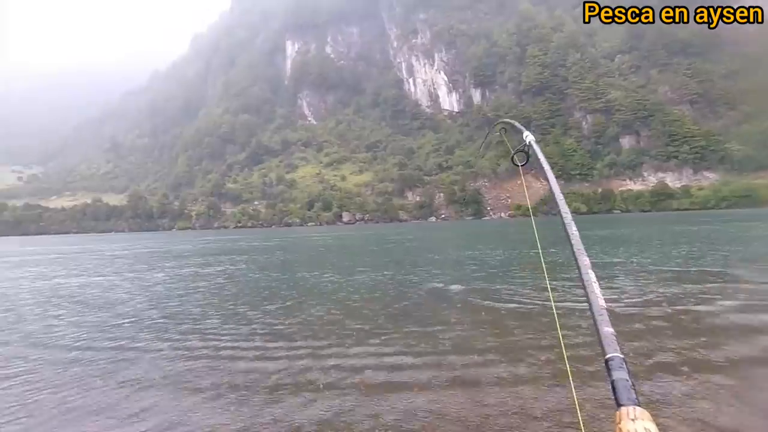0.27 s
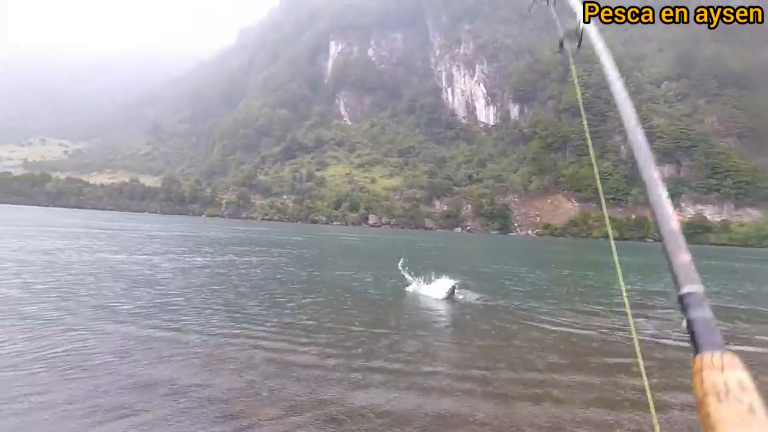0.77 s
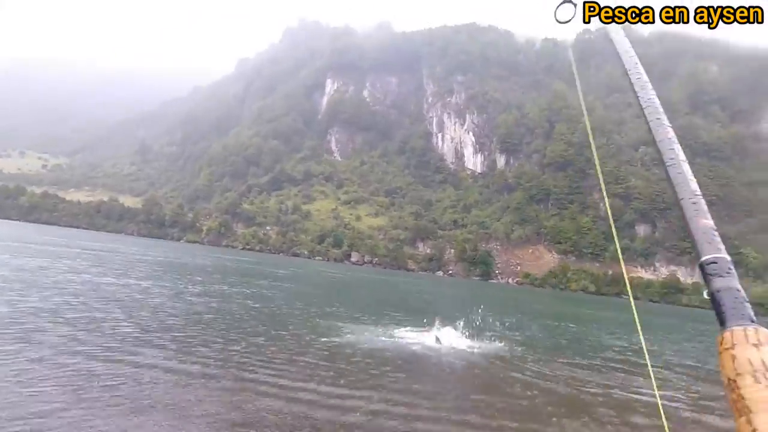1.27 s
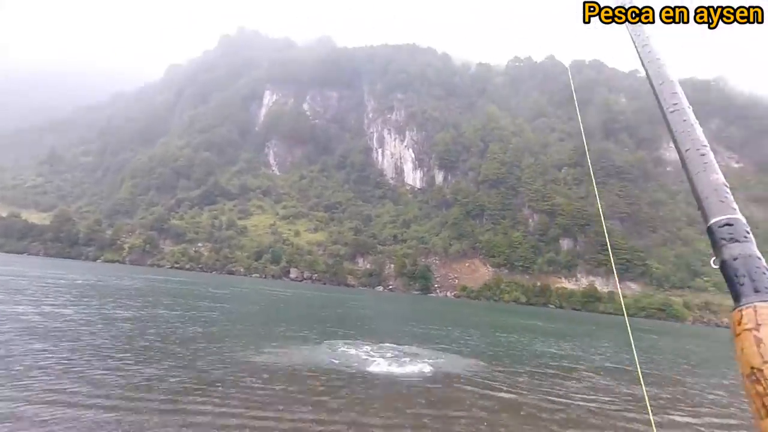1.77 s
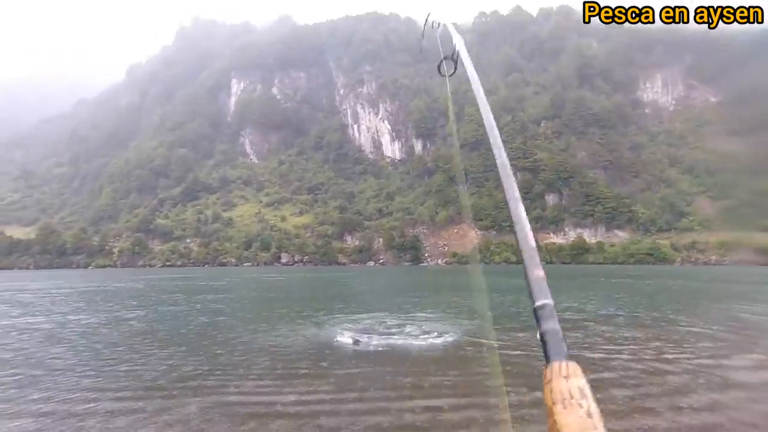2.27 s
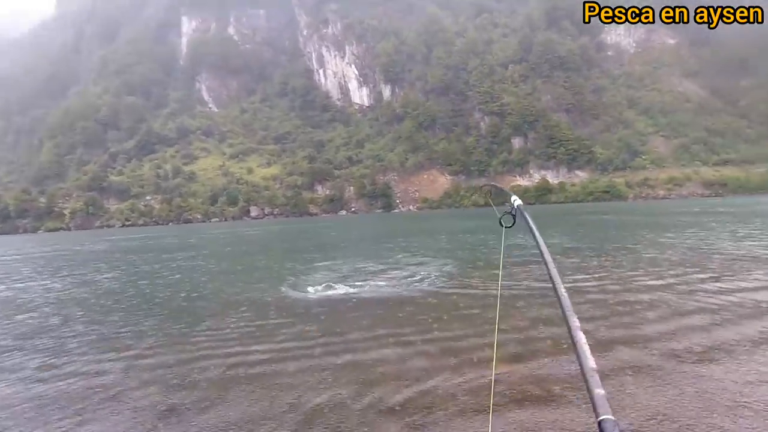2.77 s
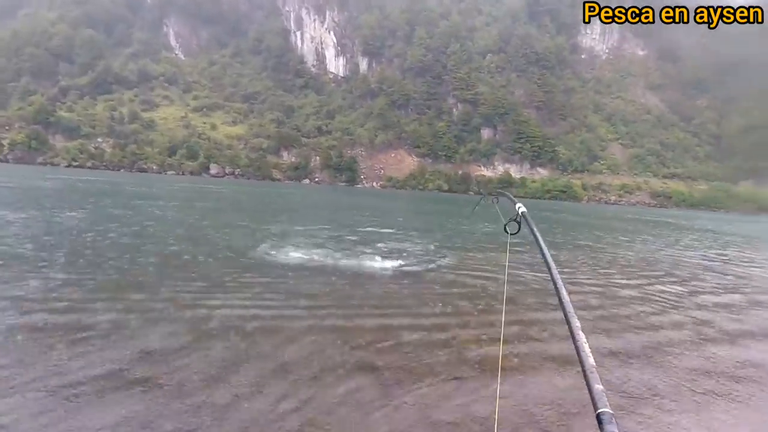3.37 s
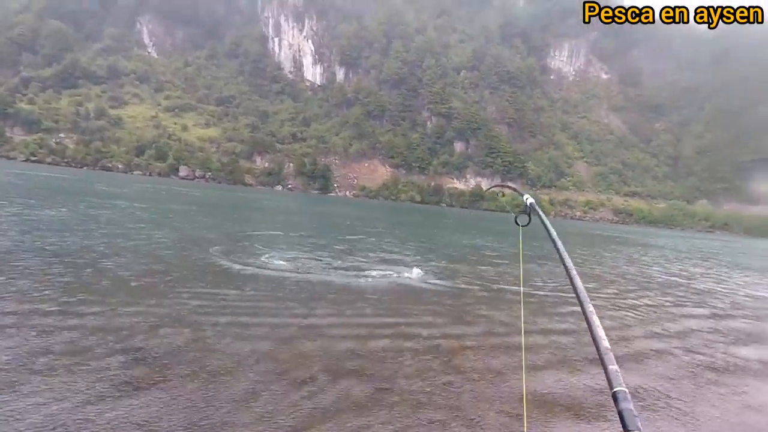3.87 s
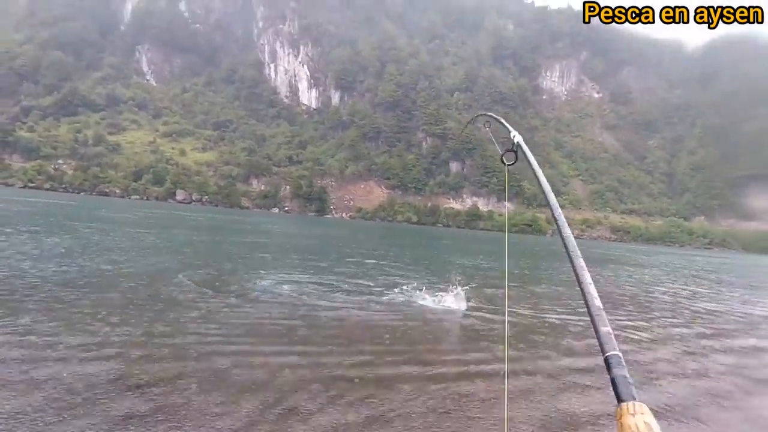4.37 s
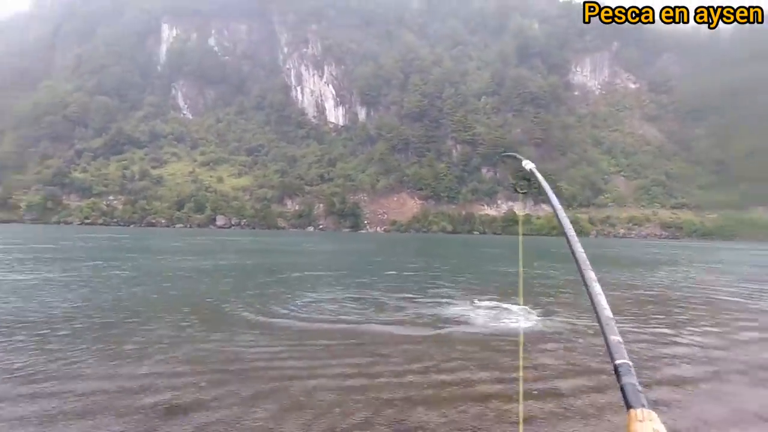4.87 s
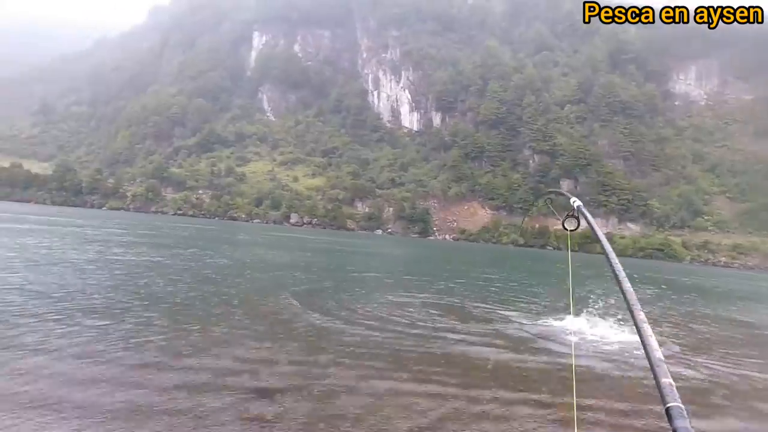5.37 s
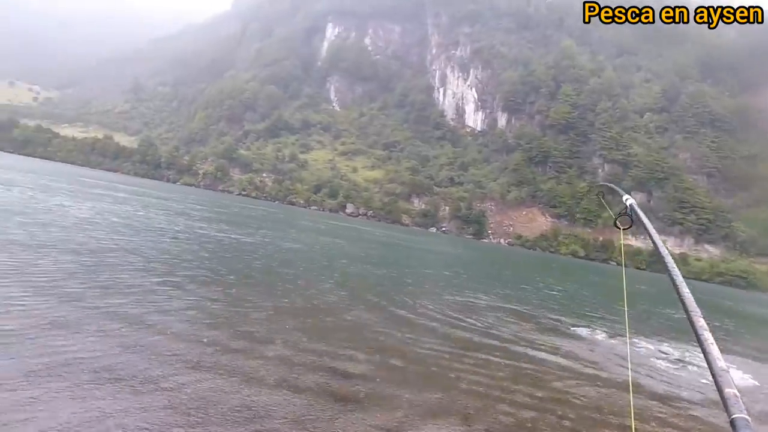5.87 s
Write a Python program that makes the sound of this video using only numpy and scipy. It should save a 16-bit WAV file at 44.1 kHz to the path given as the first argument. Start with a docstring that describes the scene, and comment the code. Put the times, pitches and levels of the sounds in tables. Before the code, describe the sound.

A close, mono outdoor sound beside a river with a faint steady wash. At 0 s a wind thump and six quick, bright reel ticks in the first 0.15 s. Splashes with gulping bubbles come at 0.35 s, a sharp spray burst at 0.75 s, and more at 1.1, 1.4 and 1.7 s, with dry rod taps between and low gusts buffeting until about 3.5 s. From 2.1 s line rasps through the rod rings, first ringing, then a duller scrape, over soft churning. At 2.8 s metallic ticks quicken into a dense buzz by 3.3 s, breaking up around 3.8-4.1 s with small gear knocks. Splashes return at 4.15-4.6 s, wind now weak. Scattered ticks at 4.8-5 s lead to splashes at 5.13 and 5.3 s and a second rattling buzz, 5.2-6.0 s, slowing to a few final ticks as the breeze fades.

```python
"""A hooked fish thrashes at the surface of a river, close to a microphone and a working reel.
First come a few ticks of the reel's pawl, gusts on the microphone, taps on the rod and splashes;
then line rasps through the rod rings as the rod is lowered, and the ticks speed up into a buzz.
After more splashes and scattered ticks comes a second buzz, as the breeze dies down.
Struck parts are fading sine waves, water is bubbles and random clicks, and wind is filtered noise."""
import sys
import numpy as np
from scipy import signal
from scipy.fft import rfft, irfft, next_fast_len
from scipy.io import wavfile
from scipy.ndimage import map_coordinates

SR = 44100
rng = np.random.default_rng(int(sys.argv[2]) if len(sys.argv) > 2 else 0)


def persist_wave(psi):
    """Save psi, clipped to +-1, as 16-bit WAV."""
    counts = np.round(np.clip(psi, -1, 1) * 32767).astype(np.int16)
    wavfile.write(sys.argv[1], SR, np.atleast_2d(counts).T)


N = 270333
TIME = np.arange(N) / SR  # s

# tone colour of the microphone's port: [f/Hz, relative level/dB]
PORT = [(3500, 3), (4200, -2.5), (4900, 4), (5450, 6), (6050, -14.5), (7500, -12.5), (9050, 0),
        (10300, -12), (11800, -18.5), (15000, -22), (15800, -40)]
# modes of the reel's housing: [f/Hz, relative level/dB, time to fade by 60 dB t60/s]
HOUSING_MODES = [(1290, 2, 0.0096), (1588, 5.5, 0.013), (1866, 0, 0.019), (2360, -3.5, 0.0083),
                 (2845, -17, 0.043)]
# long modes of the pawl's spring: [f/Hz, relative level/dB, t60/s]
SPRING_MODES = [(6964, 0.5, 0.12), (7900, -24, .14), (8940, -13, 0.12), (8900, -19, 0.06),
                (10000, -25, .09), (13580, -37, .1)]


def amp(db):
    """Turns decibels into a gain."""
    return 10 ** (np.asarray(db) / 20)


def unit(x):
    """Scales a sound to an rms level of 1."""
    return x / np.sqrt(np.mean(x ** 2) + 1e-20)


def level(rows, axis=1):
    """Gain along a curve of times and decibels; practically silent outside it."""
    rows = np.array(rows)
    return amp(np.interp(TIME, rows[:, 0], rows[:, axis], left=-140, right=-140))


def add(mix, s, sound):
    """Mixes a sound in at time s, cut off where the mix ends."""
    start = max(round(s * SR), 0)
    part = mix[start:][:len(sound)]
    part += sound[:len(part)]


def colour(x, *spectra):
    """Filters a sound by one or more (Hz, dB) curves, then scales it to rms 1."""
    size = next_fast_len(N + 8192)
    log_f = np.log(np.fft.rfftfreq(size, 1 / SR) + 1)
    db = 0
    for spectrum in spectra:
        hz, curve_db = np.array(spectrum).T
        db = db + np.interp(log_f, np.log(hz), curve_db)
    return unit(irfft(rfft(x, size) * amp(db), size)[:N])


def resonate(x, hz, width):
    """Passes a sound through one resonance, with gain 1 at its peak."""
    b, a = signal.iirpeak(min(hz, SR / 3), hz / width, SR)
    return signal.lfilter(b, a, x)


def grains(per_s, spread_db):
    """Clicks at random times with random signs, a few much larger than the rest."""
    size = amp(spread_db * np.minimum(rng.exponential(1, N), 4))
    happens = rng.random(N) < per_s / SR
    return unit(size * rng.choice([-1, 1], N) * happens)


def ragged(x, depth_db, span_s, span_hz):
    """Lets the tone wander in random patches of time and pitch; the overall level is kept."""
    hz, t, z = signal.stft(x, SR, nperseg=256)
    place = np.meshgrid(hz / span_hz, t / span_s, indexing="ij")
    patches = map_coordinates(rng.standard_normal((128, 1024)), place, order=1, mode="wrap")
    patchy = signal.istft(z * amp(depth_db * patches), SR, nperseg=256)[1][:N]
    return np.std(x) * unit(patchy)


def retuned(modes, factor):
    """The same modes at a higher or lower pitch."""
    return np.array(modes) * [factor, 1, 1]


def strike(modes, vary_db, detune, contact_s, shift=.9):
    """One blow sets modes ringing; each blow shares its energy out a little differently."""
    hz, db, t60 = np.transpose(modes)[:, :, None]
    t = np.arange(SR // 6) / SR
    t = t[t < t60.max() * 1.5]
    louder, sharper = rng.standard_normal((2, len(modes), 1))
    lag = shift * rng.standard_normal((len(modes), 1))  # the point of contact shifts from blow to blow
    fading = amp(db + vary_db * louder - 60 * t / t60)
    waves = fading * np.sin(2 * np.pi * hz * (1 + detune * sharper) * t + lag)
    return waves.sum(0) * (1 - np.exp(-t / contact_s))


def river():
    """The steady wash of the river: noise with a fixed tone colour."""
    # spectrum of the wash: [f/Hz, relative level/dB]
    wash = [(30, -12), (105, -11), (170, 11), (260, -2.5), (500, -4), (1100, -6), (2000, -9), (3500, -15.5),
            (5500, -13), (7000, -1.5), (9000, -15.5), (15000, -12.5)]
    return amp(-44.5) * colour(rng.standard_normal(N), wash, PORT)


def eddies(spectrum, steady_s):
    """Turbulent pressure as noise, its strength evened out over spans longer than steady_s."""
    x = colour(rng.standard_normal(N), spectrum)
    window = signal.windows.hann(int(steady_s * SR))
    power = signal.fftconvolve(x ** 2, window / window.sum(), "same")
    return x / np.sqrt(power + 0.05)


def wind():
    """Gusts swell out of the breeze and rumble on the microphone; flutter lies higher, puffs pop."""
    # the breeze dying down: [t/s, rumble/dB, flutter/dB], levels before the final balance
    breeze = [(0, -35, -43), (1.0, -32, -41), (2.6, -31, -43), (3.2, -36.5, -45), (4.4, -39, -43),
              (5.3, -44.5, -49), (6.13, -57, -56)]
    # gusts: [middle t/s, length/s, rumble/dB, flutter/dB], levels before the final balance
    gusts = [(0.03, .055, -15, -23), (0.48, .09, -25, -40), (0.69, 0.13, -20, -23.5),
             (0.84, .08, -18.5, -27.5), (1.178, .06, -25, -29.5), (1.276, 0.046, -20.5, -18.5),
             (1.368, 0.061, -23.5, -24.5), (1.502, 0.073, -26.5, -29), (1.713, 0.087, -18, -16.5),
             (1.83, 0.083, -18, -34), (2.019, .08, -19.5, -20), (2.307, 0.11, -14.5, -16),
             (2.558, 0.16, -14, -18), (2.705, 0.047, -25, -31), (2.997, 0.066, -18.5, -20.5),
             (3.28, 0.048, -26, -33), (3.402, 0.064, -23.5, -40), (3.52, .12, -22.5, -28),
             (4.337, .08, -35, -33), (4.51, .06, -39, -31), (5.27, 0.12, -40, -38.5)]
    # short puffs: [start t/s, peak level/dB, f/Hz]
    puffs = [(1.262, -13, 79), (4.0, -22.5, 75.5), (4.314, -25, 71), (4.616, -28, 130), (4.733, -25, 93),
             (4.986, -26, 70)]
    # spectrum of the deep rumble: [f/Hz, relative level/dB per Hz]
    rumble_spectrum = [(2, -60), (10, -6), (22, -2), (58, 1), (85, -6), (130, -17.5), (300, -61),
                       (1000, -93)]
    # spectrum of the higher flutter: [f/Hz, relative level/dB per Hz]
    flutter_spectrum = [(45, -41), (85, 0), (115, 3.5), (170, -5), (260, -17.5), (500, -32), (1500, -82),
                        (5000, -71)]
    # gusts and breeze add as powers
    rumble, flutter = level(breeze, axis=1) ** 2, level(breeze, axis=2) ** 2
    for s, length_s, rumble_db, flutter_db in gusts:
        swell = np.exp(-2 * ((TIME - s) / length_s) ** 2)
        rumble += (amp(rumble_db) * swell) ** 2
        flutter += (amp(flutter_db) * swell) ** 2
    out = amp(1.5) * np.sqrt(rumble) * eddies(rumble_spectrum, 0.12)
    out += amp(-2.5) * np.sqrt(flutter) * eddies(flutter_spectrum, 0.11)
    for s, db, hz in puffs:
        turns = np.arange(0, 2, hz / SR)  # two cycles
        add(out, s, amp(db) * np.sin(2 * np.pi * turns) * np.sin(np.pi * turns / 2) ** 2)
    return out


def line():
    """Line slips over the rod rings in tiny, uneven catches; the rings sing while it is taut."""
    # how strongly the line rasps: [t/s, level/dB before a small final lift]
    rasp = [(2.11, -57.5), (2.16, -38), (2.25, -35), (2.38, -39), (2.48, -37), (2.62, -38), (2.75, -43.5),
            (3.5, -46.5), (3.8, -61)]
    # resonances of the rings: [f/Hz, basic width/Hz, relative level/dB]
    ring_modes = [(1730, 350, 9), (2225, 170, 10), (3180, 840, -6.5), (5010, 420, 0)]
    # spectrum of the bare scrape: [f/Hz, relative level/dB]
    scrape_spectrum = [(300, -18), (800, 2), (1700, 4), (2700, -2), (4200, -3), (5400, -6.5), (6500, 9.5),
                       (9000, -6), (12000, -16), (16000, -16)]
    # the rings' share of the power dies away as the line slackens
    taut_share, slackens_s, slack_s = 0.61, 2.32, 2.58
    share = np.clip(np.interp(TIME, [slackens_s, slack_s], [taut_share, 0]), 0, 1)
    slips = grains(2500, 4.1) + 0.7 * rng.standard_normal(N)
    rings = np.zeros(N)
    for hz, width, db in ring_modes:
        rings += amp(db) * resonate(resonate(slips, hz, 1.4 * width), hz, 2.0 * width)
    rings = ragged(unit(rings), depth_db=9, span_s=.013, span_hz=900)
    scrape = ragged(colour(slips, scrape_spectrum, PORT), depth_db=3.5, span_s=.016, span_hz=597)
    return amp(2) * level(rasp) * (np.sqrt(share) * rings + np.sqrt(1 - share) * scrape)


def taps():
    """Dry, heavily damped taps on the rod and handle: a sharp contact and a knock of a few cycles."""
    # taps: [t/s, relative level/dB, f/Hz of the knock]
    tap_list = [(0.2088, -17.5, 1300), (0.546, -26, 2500), (0.6585, -26, 1200), (0.8848, -14.5, 1000),
                (1.0038, -18, 1900), (1.5438, -20.5, 1000), (1.789, -23, 1700), (1.831, -31, 2000),
                (1.9228, -23, 1400), (2.402, -31, 6000), (4.421, -33, 3300), (4.481, -26, 1600)]
    out, t = np.zeros(N), np.arange(SR // 30) / SR
    for s, db, hz in tap_list:
        scuff = 0.18 * rng.standard_normal(len(t)) * np.exp(-t / 0.0036)
        contact = resonate(scuff + (t == 0), 0.76 * hz, 1.8 * hz)  # t == 0 is a single click
        knock = np.sin(2 * np.pi * hz * t) * np.exp(-t / 0.00049)
        add(out, s, amp(db) * (1.15 * contact / abs(contact).max() + 1.73 * knock))
    return np.std(out) * colour(out, PORT)


def bubble(hz, cycles, rise):
    """An air pocket rings and climbs in pitch as it nears the surface."""
    age = np.arange(0, 5, hz / cycles / SR)  # counted in decay times, each lasting the given cycles
    wave = np.sin(2 * np.pi * cycles * (age + rise * age ** 2 / 2))
    return wave * np.exp(-age) * (1 - np.exp(-age * 6))


def thrashing():
    """Strength of churn and of spray: each thrash swells and dies away, and their powers add."""
    # thrashes and falls of spray: [peak t/s, rise/s, time to fade by 20 dB/s, churn/dB, spray/dB]
    thrashes = [(0.335, .018, .16, -31, -40), (0.39, .03, .25, -33, -49), (0.749, .009, .17, -30, -38),
                (0.92, .12, 0.38, -38, -43), (1.12, 0.034, .5, -35, -49.5), (1.26, 0.11, 1.0, -37, -48),
                (1.385, .025, 0.02, -29, -60), (1.715, 0.018, .14, -33, -56), (2.47, .02, 0.27, -33, -70),
                (2.709, .02, 0.2, -33.5, -70), (2.87, 0.063, 0.32, -32, -65.5),
                (3.94, .03, 0.1, -38.5, -66), (4.16, 0.032, 0.15, -29, -48), (4.35, 0.082, 0.26, -35, -58),
                (4.505, .03, .22, -32, -57), (4.61, 0.035, 0.37, -45, -50.5), (4.84, 0.044, 0.3, -40, -63),
                (5.13, .02, 0.4, -34, -56), (5.29, .05, 0.63, -32.5, -51), (5.55, .12, 0.7, -39.5, -56)]
    # water lapping between the thrashes: [t/s, churn/dB]
    lapping = [(0, -47), (0.7, -42), (2.9, -41), (4.9, -45), (5.9, -46.5), (6.13, -48.5)]
    churn, spray = level(lapping) ** 2, np.zeros(N)
    for s, rise_s, fade_s, churn_db, spray_db in thrashes:
        age = TIME - s
        rising = (np.minimum(age, 0) / rise_s) ** 2
        fading = np.log(10) * np.maximum(age, 0) / fade_s
        swell = np.exp(-rising - fading)
        churn += (amp(churn_db) * swell) ** 2
        spray += (amp(spray_db) * swell) ** 2
    return np.sqrt(churn), np.sqrt(spray)


def splashes():
    """The fish churns up bubbles, traps large air pockets and throws spray that patters back."""
    # large air pockets closing: [start t/s, level/dB before the bubble's own fade, starting f/Hz]
    gulps = [(0.334, -21, 374), (0.384, -22, 442), (0.409, -21, 389), (1.098, -22.5, 490),
             (1.379, -25, 390), (1.714, -17.5, 367), (1.745, -20, 460), (2.939, -23, 390),
             (3.949, -19, 524), (4.149, -21.5, 496), (4.179, -18, 804), (4.257, -23, 260),
             (4.346, -20, 714), (4.487, -17.5, 271), (4.517, -21, 776), (5.126, -21, 315),
             (5.181, -21, 482), (5.294, -21, 540)]
    # spectrum of the churned water: [f/Hz, relative level/dB]
    slosh = [(100, -9), (220, -2), (380, 0.5), (650, -2.5), (1000, -1.5), (1400, -4), (1800, -11.5),
             (3000, -22), (6000, -42), (16000, -65)]
    # spectrum of the pattering drops: [f/Hz, relative level/dB]
    drop_spectrum = [(300, -10), (900, 8), (1400, 10), (1750, -2), (2200, 6), (3000, 0), (5000, 6),
                     (9000, -2.5), (16000, -9)]
    # spectrum of the finest drops: [f/Hz, relative level/dB]
    fizz_spectrum = [(1500, -25), (4000, 0.5), (6000, 2), (9000, 5), (12000, -6), (16000, -1)]
    churn, spray = thrashing()
    cloud = np.zeros(N)
    for hz in np.geomspace(230, 1700, num=24):  # 24 sizes of bubble
        ring = bubble(hz, cycles=5.2, rise=0.0637)
        cloud += unit(signal.oaconvolve(grains(26, 2.53), ring)[:N])
    out = churn * colour(unit(cloud) + 0.94 * grains(3000, 3.4), slosh)
    patter = grains(2500, 3.5) + .9 * rng.standard_normal(N)
    drops = amp(9.5) * spray * colour(patter, drop_spectrum, PORT)
    # the harder the thrash, the more of the water flies as fine drops
    fine_spray = spray * (spray / amp(-43)) ** 0.36
    fizz = fine_spray * colour(grains(3000, 4.4), fizz_spectrum, PORT)
    out += ragged(drops + fizz, depth_db=4.5, span_s=.014, span_hz=449)
    for s, db, hz in gulps:
        add(out, s, amp(db) * bubble(hz, cycles=3.6, rise=0.067))
    return out


def gears():
    """Play between the loaded gears knocks on the housing, at nearly even intervals in each bout."""
    # bouts of knocks: [first t/s, number of knocks, spacing/s, typical peak level/dB, pitch factor]
    bouts = [(0.0604, 1, 0, -19, 1.05), (3.4496, 4, .0715, -20, .97), (3.4625, 1, 0, -19, .97),
             (3.69, 1, 0, -19, .97), (3.8335, 5, .0364, -21, .96), (4.0692, 2, .0326, -21, 1),
             (5.16, 1, 0, -21, 1), (5.228, 5, .0238, -18, 1.06), (5.3746, 12, .0237, -19.5, 1.1),
             (5.6852, 2, .0253, -22.5, 1.05)]
    scatter_db, jitter_s = 1.0, .0007  # how far knocks differ in strength and timing
    out = np.zeros(N)
    for start, count, spacing, db, pitch in bouts:
        for k, (late, hard) in enumerate(rng.standard_normal((round(count), 2))):
            knock = strike(retuned(HOUSING_MODES, pitch), vary_db=4.0, detune=0.0073, contact_s=0.00017)
            size = amp(db + scatter_db * hard)
            add(out, start + k * spacing + jitter_s * late, size * knock / abs(knock).max())
    return out


def tooth(edge_db, pitch=1):
    """The pawl drops onto a tooth, rings on its edge and bounces once; peak 1."""
    # short modes of the pawl and spool: [f/Hz, relative level/dB, t60/s]
    pawl_modes = [(4876, -0.5, 0.0097), (5164, -2.5, 0.011), (5405, -7.5, 0.012), (6340, -3, 0.01),
                  (6605, 0.5, 0.011), (7640, -7.5, 0.013), (8500, -14, .006), (8790, -12.5, 0.011),
                  (9160, -11, 0.017), (10140, -18.5, 0.014), (10480, -13.5, 0.017), (13300, -27, 0.0089),
                  (15000, -32, 0.0054)]
    # modes that ring when the pawl lands on its edge: [f/Hz, relative level/dB, t60/s]
    edge_modes = [(4680, -1, 0.0064), (8650, -1.5, 0.013), (9870, 1.5, 0.01), (13900, -16, 0.0098),
                  (14800, -16, .008)]
    # hop of the pawl before it lands again: [shortest/s, longest/s]
    hop_s = (.0008, .0013)
    click, pawl = np.zeros(SR // 40), retuned(pawl_modes, pitch)
    edge = strike(retuned(edge_modes, pitch), vary_db=4.5, detune=0.006, contact_s=0.00024)
    add(click, 0, strike(pawl, vary_db=3.5, detune=0.005, contact_s=0.00027, shift=.6))
    add(click, 0, amp(edge_db) * edge)
    bounce = strike(pawl, vary_db=1.5, detune=0.0061, contact_s=0.00019)
    add(click, rng.uniform(*hop_s), amp(-5.5) * bounce)
    return click / abs(click).max()


def single_ticks():
    """Separate ticks: each tooth click also sets the pawl's spring ringing."""
    # ticks: [t/s, peak level/dB before the cover, edge modes against the pawl/dB]
    ticks = [(0.0192, -20.5, -3), (0.0373, -15, 4), (0.0579, -13, 10), (0.0802, -17.5, 2),
             (0.1053, -20.5, -1), (0.154, -20.5, -6), (2.7285, -18.5, -18), (3.426, -13.5, -12),
             (3.7876, -16.5, -16), (3.8107, -14, -18), (4.0003, -17, -21), (4.0246, -16.5, -18),
             (4.058, -14.5, -19), (4.0885, -23, -9), (4.1004, -19.5, -18), (4.784, -15.5, -11),
             (4.8406, -16, -10), (4.879, -21.5, -12), (4.9657, -16, -7), (5.1624, -16, -12),
             (5.4633, -11, -1), (6.0435, -21, 2), (6.057, -16, -5), (6.072, -20, -12), (6.0927, -19.5, -3)]
    clicks = np.zeros(N)
    for s, db, edge_db in ticks:
        add(clicks, s, amp(db) * tooth(edge_db))
        ring = strike(SPRING_MODES, vary_db=1.5, detune=0.00051, contact_s=0.0015)
        add(clicks, s, amp(db - 21.5) * ring)
    return clicks


def buzzing_runs():
    """Teeth pass fast enough to buzz; each rings the spring and rattles the housing and spool rim."""
    # one table a run: [t/s, teeth per second/Hz, typical peak level of a tooth/dB before the cover]
    runs = [
        [(2.794, 35.8, -19), (2.85, 41.8, -19), (2.93, 41.8, -19.5), (3.02, 57.9, -15), (3.08, 75.7, -18),
         (3.14, 79.5, -13.5), (3.2, 95, -17), (3.33, 163, -15), (3.415, 163, -15.5)],
        [(3.44, 170, -14.5), (3.56, 168, -15.5), (3.63, 140, -13.5), (3.69, 85, -18.5), (3.73, 64, -19.5),
         (3.775, 58, -22)],
        [(3.821, 130, -17), (3.885, 190, -16.5), (3.93, 130, -17.5), (3.99, 105, -19.5)],
        [(5.179, 80, -16.5), (5.215, 142, -16.5), (5.24, 130, -17), (5.26, 80, -23)],
        [(5.267, 150, -17), (5.33, 135, -17), (5.47, 162, -15), (5.6, 165, -16.5), (5.67, 195, -18.5),
         (5.73, 147, -18.5), (5.84, 112, -16.5), (5.9, 82, -18.5), (5.97, 100, -18.5), (6.03, 78, -18)],
    ]
    # load on the gears: [t/s, basic level of their rattle against the pawl/dB]
    load = [(3.0, -28), (3.4, -22.5), (3.9, -11), (5.2, -13.5), (5.33, -9.5), (5.6, -11.5), (5.72, -17),
            (6.05, -20)]
    # the spool's rim, which sings out under heavy load: [f/Hz, relative level/dB, t60/s]
    rim_modes = [(3975, -13.5, 0.084)]
    teeth_per_turn, wobble_db = 8, 1.3  # the wheel runs out of true, so blows swell once a turn
    scatter_db, jitter_s = 1.0, .00003  # random strength and timing of the teeth
    sag, sag_at_per_s = 0.0057, 154  # share by which the spring rings flat at this tooth rate
    rise_per_db, rest_load_db = .0016, -19  # load stiffens the pawl, so its modes rise by this share
    clicks, rattles = np.zeros((2, N))
    for run in runs:
        at, teeth, peak_db = np.transpose(run)
        t = np.arange(at[0], at[-1], 1 / SR)
        rate = np.interp(t, at, teeth)
        # a tooth drops each time the running count passes a whole number
        count = np.floor(np.cumsum(rate) / SR)
        drops = np.flatnonzero(np.diff(count, prepend=-1))
        wobble = wobble_db * np.cos(2 * np.pi * np.arange(len(drops)) / teeth_per_turn)
        chance = rng.standard_normal((len(drops), 4))
        for i, swell, (late, hard, ring, rattle) in zip(drops, wobble, chance):
            s = t[i] + jitter_s * late
            size = amp(np.interp(s, at, peak_db) + swell + scatter_db * hard)
            load_db = np.interp(s, *np.transpose(load))
            pitch = 1 + rise_per_db * (load_db - rest_load_db)
            add(clicks, s, size * tooth(edge_db=-13, pitch=pitch))
            # pressed by the passing teeth, the spring rings a little flat
            pressed = retuned(SPRING_MODES, 1 - sag * rate[i] / sag_at_per_s)
            spring = strike(pressed, vary_db=0, detune=0.00082, contact_s=0.00068)
            add(clicks, s, size * amp(-24 + 3.0 * ring) * spring)
            housing = strike(HOUSING_MODES, vary_db=2.5, detune=0.029, contact_s=0.00039)
            add(rattles, s, size * amp(load_db - 5.5 + 3.1 * rattle) * housing)
            rim = strike(rim_modes, vary_db=3.5, detune=0.0056, contact_s=.001)
            add(rattles, s, size * amp(1.48 * load_db - 5.5) * rim)
    return clicks, rattles


def ratchet():
    """The reel's pawl clicks over the teeth; the cover colours the clicks but not the rattles."""
    # what the reel's cover lets through: [f/Hz, relative level/dB]
    cover = [(500, -16), (3000, 3), (4250, -11.5), (4700, -3), (5400, 4), (5850, 0), (6300, 2.5), (8200, 4),
             (9300, -3), (10600, 1), (11500, -7.5), (12700, 2.5), (15200, 1)]
    clicks, rattles = buzzing_runs()
    clicks += single_ticks()
    # the tone of the clicks wanders at random
    covered = ragged(colour(clicks, cover), depth_db=1.9, span_s=.03, span_hz=818)
    return np.std(clicks) * covered + rattles


def scene():
    """River, wind, line, taps, splashes and reel, mixed to one channel."""
    background = river() + wind()
    return (background + line() + taps() + splashes() + gears() + ratchet())[None]


def record(dry):
    """The sound fades in within 8 ms, and a low-pass filter removes the highest treble."""
    edge_hz = 15700
    faded = dry * np.minimum(TIME / .008, 1)
    lowpass = signal.firwin(255, edge_hz, window=("kaiser", 9), fs=SR)
    return signal.oaconvolve(faded, lowpass[None], "same")


dry = scene()
out = record(dry)
persist_wave(out)
```